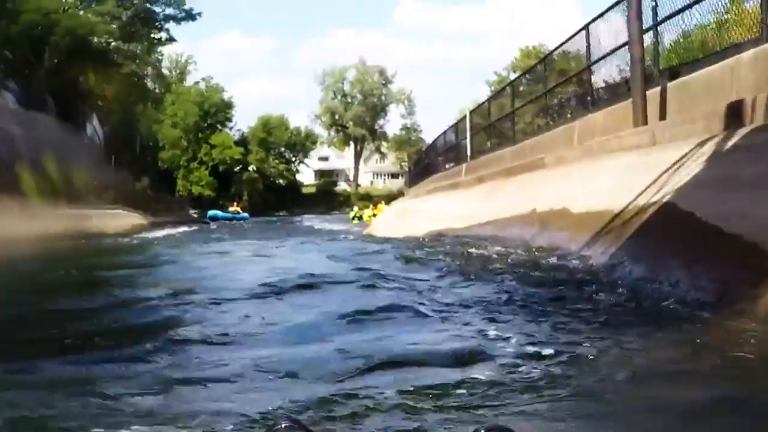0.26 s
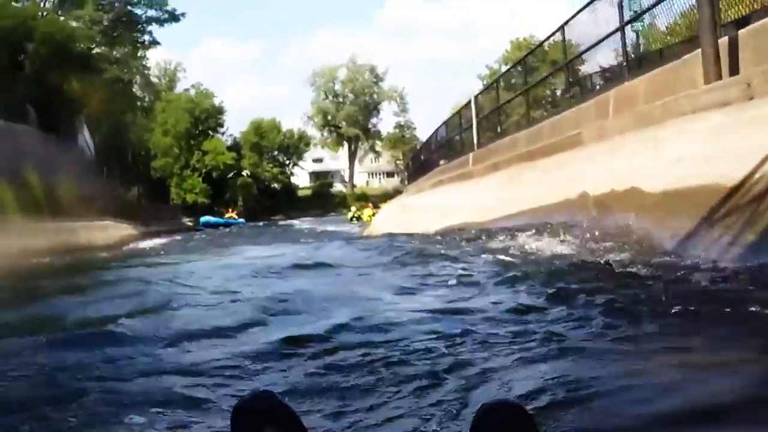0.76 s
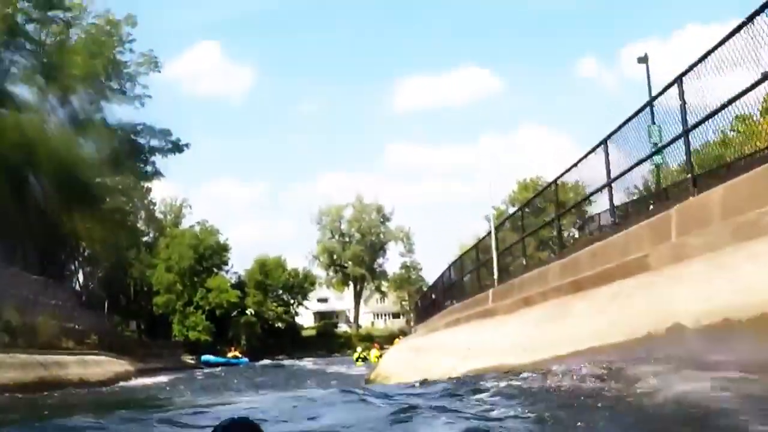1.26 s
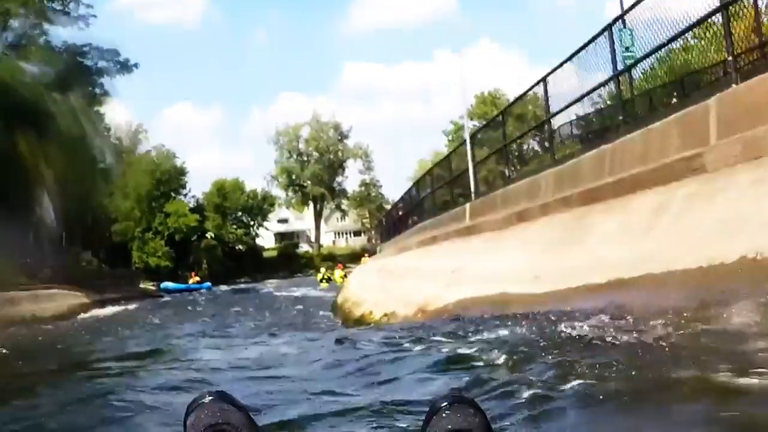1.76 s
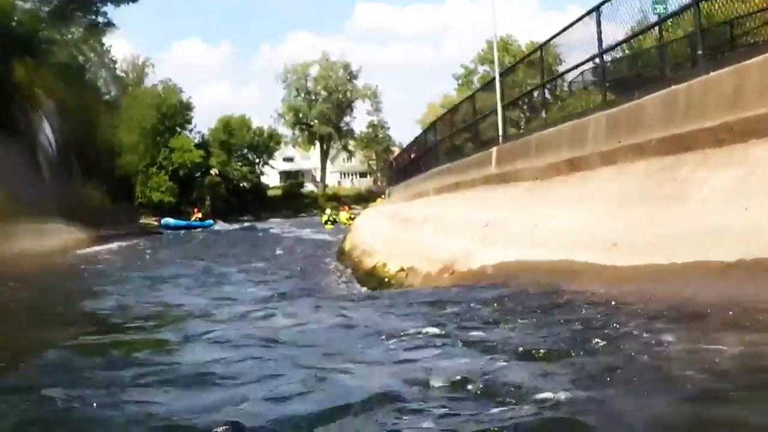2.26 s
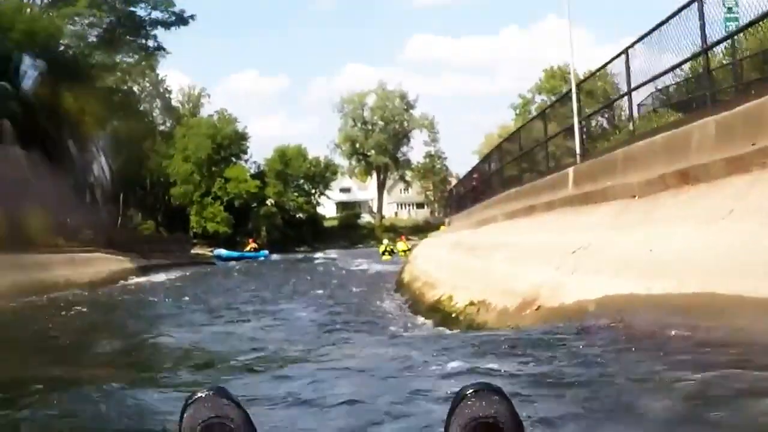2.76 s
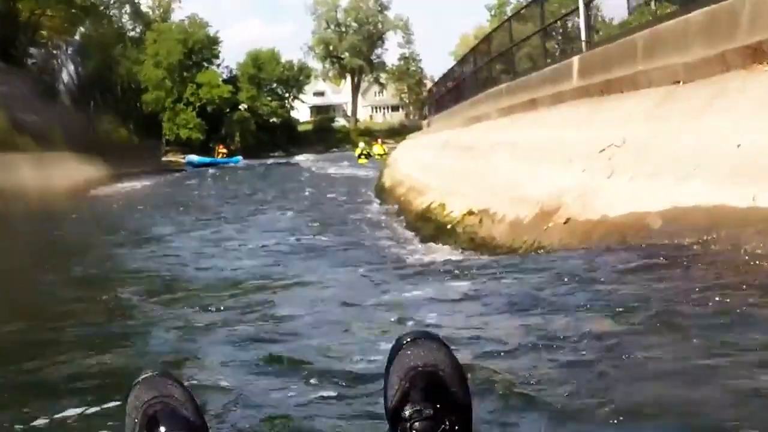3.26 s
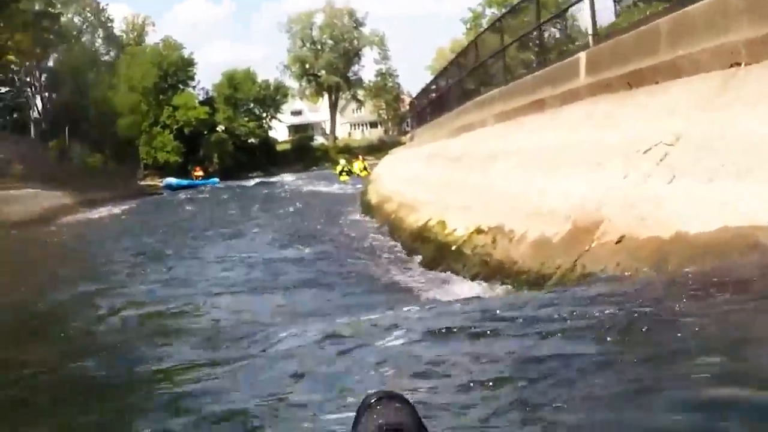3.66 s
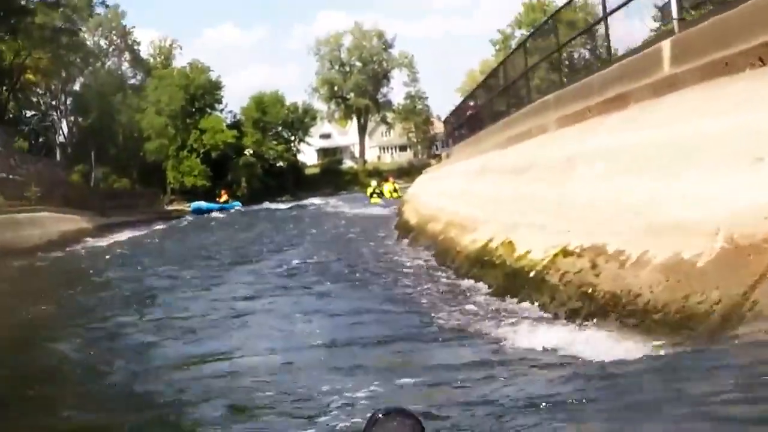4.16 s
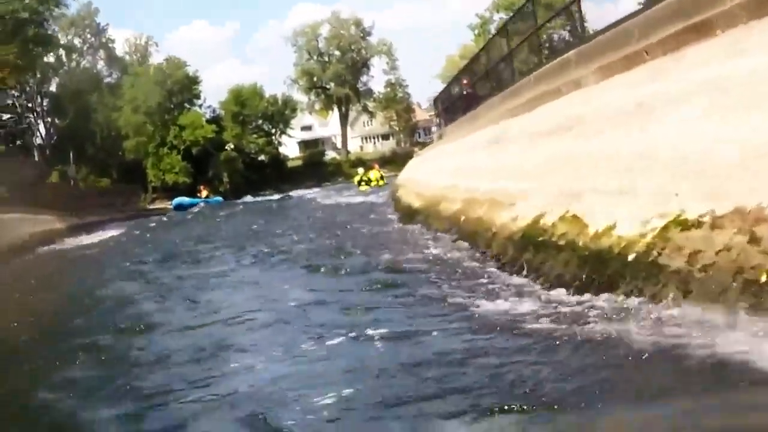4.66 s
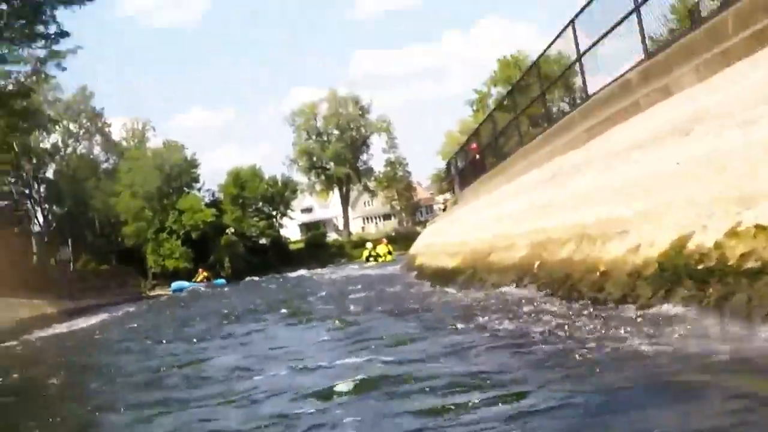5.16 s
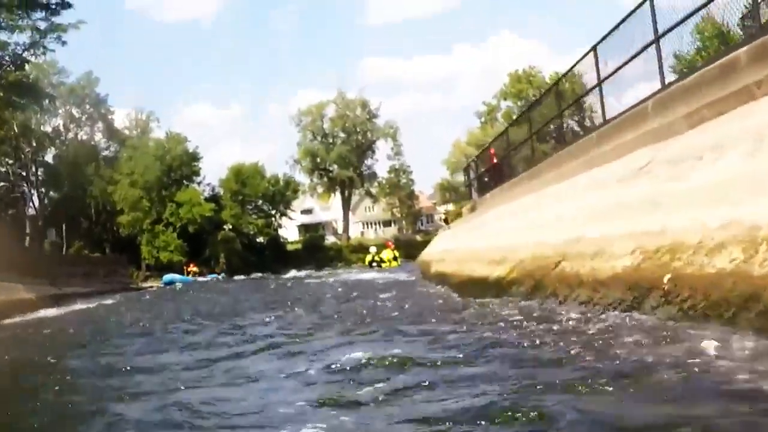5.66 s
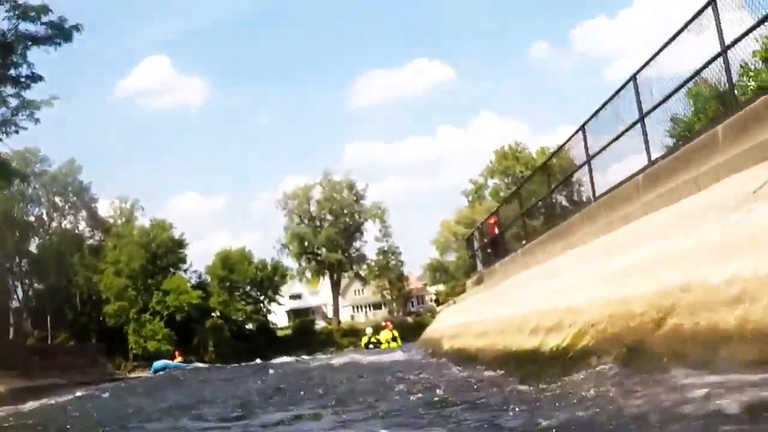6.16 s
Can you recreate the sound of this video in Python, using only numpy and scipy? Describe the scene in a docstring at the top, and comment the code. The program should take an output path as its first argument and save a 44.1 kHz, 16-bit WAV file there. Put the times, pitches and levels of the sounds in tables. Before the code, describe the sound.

Fast water streams past microphones sealed in a waterproof housing just above the surface, giving a close, hollow, mid-heavy rush with little open treble and a faint diffuse hiss around it. Bubbles blip and droplets tick throughout, over low buffeting rumble. From 0 to 1.5 s the flow is fairly even, with soft knocks near 0.8 and churning from 1.1. At 1.6 a strong dull knock slaps the float; bright plops and spatter follow at 1.75 and 2.05 to 2.15. At 2.55 another thud leads into a low gulp of air, with fainter gulps around 3. It then steadies until crisp splashes and bubbles at 4.45 to 4.6. Heavy, very deep thumps heave the float from 5.0 to 5.4 as gurgling strengthens. Splashes snap at 5.8, a knock lands at 6.05, and bubbles, drops and a last low heave crowd 6.2 to 6.4.

```python
"""Riding fast water in a channel

Place: just above fast river water in a concrete channel, two microphones inside a waterproof housing.
Near: noise, droplet clicks and splashes drive the housing's resonances; bubbles are sliding sines and
drops are bursts of narrow noise. All around: a diffuse hiss of shaped noise.
Under the float: noise rumbles and churns; deep steady-pitched pulses make thumps, gliding tones make
dull knocks and gulps of air."""
import sys
import numpy as np
from scipy import signal
from scipy.io import wavfile
from scipy.ndimage import uniform_filter1d, map_coordinates

SR = 44100
rng = np.random.default_rng(int(sys.argv[2]) if len(sys.argv) > 2 else 0)


def inscribe(sig):
    """Save sig as 16-bit PCM at rate SR to the path in sys.argv[1].

    A 1-D sig is mono; a 2-D sig holds one channel per row.
    Samples are clipped to [-1, 1] before scaling.
    """
    pcm = np.round(np.clip(np.atleast_2d(sig).T, -1, 1) * 32767)
    wavfile.write(sys.argv[1], SR, pcm.astype(np.int16))


N = 283122


def from_db(db):
    """Decibels to gain."""
    return 10 ** (np.asarray(db) / 20)


def rms_one(x):
    """Scale to rms 1."""
    return x / np.sqrt(np.mean(x ** 2) + 1e-20)


def in_time(rows):
    """Each column of a curve at every sample."""
    s, *columns = np.transpose(rows)
    return [np.interp(np.arange(N) / SR, s, column) for column in columns]


def blend(hz, corners_hz, values):
    """Values given at a few frequencies, joined on a log axis."""
    shares = [np.interp(np.log(hz), np.log(corners_hz), row) for row in np.eye(len(values))]
    return sum(share * value for share, value in zip(shares, values) if share > 0)


def drift(rate_hz):
    """Slow chance with spread 1: noise low-passed twice at the rate."""
    step = 40   # samples between slow values
    pole = np.exp(-2 * np.pi * rate_hz * step / SR)
    noise = rng.standard_normal(N // step + 2002)
    slow = signal.lfilter([1], [1, -2 * pole, pole * pole], noise)[2000:]   # drop the filter's start
    return np.interp(np.arange(N) / step, np.arange(len(slow)), rms_one(slow))


def add(out, s, sound):
    """Mix a short sound in at time s."""
    start = max(round(s * SR), 0)
    part = out[..., start:start + sound.shape[-1]]
    part += sound[..., :part.shape[-1]]


def coloured(spectrum, alike):
    """Stereo noise from half-octave bands, rms 1; alike is the likeness of left and right."""
    hz, db = np.transpose(spectrum)
    edges = np.geomspace(hz[0], hz[-1], round(2 * np.log2(hz[-1] / hz[0])) + 2)
    white = rng.standard_normal((2, 2, N))
    out = 0
    for k, band in enumerate(zip(edges, edges[1:])):
        # neighbouring bands take turns on two independent noises
        noise = signal.sosfilt(signal.butter(2, band, "band", fs=SR, output="sos"), white[k % 2])
        out = out + noise * from_db(blend(np.sqrt(np.prod(band)), hz, db))
    shared, opposed = out
    alike = np.clip(alike, -1, 1)
    return rms_one(np.sqrt(1 + alike) * shared + np.sqrt(1 - alike) * opposed * [[1], [-1]])


def evened(x, window_s):
    """Noise with its chance swells taken out."""
    return x / np.sqrt(uniform_filter1d(np.mean(x ** 2, axis=0), int(window_s * SR)) + 1e-9)


# the stream along the channel; only departures from each column's mean count:
# [t/s, wash level/dB, gurgle level/dB, spray level/dB]
STREAM_LEVELS = [(0.0, -48, -43.5, -56), (0.7, -47, -45, -58), (1.2, -47.5, -42, -59),
                 (1.58, -43.5, -41, -57.5), (1.85, -44, -43, -56.5), (2.1, -45, -39.5, -52),
                 (2.35, -44.5, -43.5, -55), (2.7, -46.5, -38.5, -50.5), (3.2, -46.5, -42, -57.5),
                 (4.05, -46, -42.5, -59), (4.25, -45.5, -41.5, -53.5), (4.65, -46.5, -39, -51.5),
                 (4.97, -46, -38, -46), (5.2, -44.5, -35.5, -49), (5.45, -46, -37.5, -55),
                 (5.8, -45, -37.5, -51.5), (6.08, -44, -37, -54.5), (6.42, -44.5, -39, -51.5)]


def stream():
    """Wash, gurgle and spray of the passing water, in dB about their means."""
    return [db - np.mean(db) for db in in_time(STREAM_LEVELS)]


def droplets(spread_db, count=1900):
    """Clicks of droplets that land at random, mostly small; rms 1."""
    when, size, sign = rng.random((count, 3)).T
    strength = from_db(-spread_db * np.log(size + 0.05)) * np.sign(sign - .5)
    return rms_one(np.bincount((when * N).astype(int), strength, N))


def wavering(ring, share=0.01522, rate_hz=5):
    """Water sloshing over the housing bends the pitch of a resonance a little."""
    shift = share * SR / (2 * np.pi * rate_hz) * drift(rate_hz)   # in samples
    return map_coordinates(ring, [np.arange(N) + shift], order=2)


def housing(drive, hz, width_hz, left_db, right_db, lead):
    """One resonance of the housing, which the two microphones hear with their own strength and phase."""
    b, a = signal.iirpeak(hz, hz / width_hz, fs=SR)
    twice = [np.r_[b, a]] * 2   # the same resonance, passed twice
    ring = wavering(signal.sosfilt(twice, drive)) / np.sqrt(np.pi * width_hz / (2 * SR))
    # a quarter-cycle copy of the ring lets the right microphone trail by any phase
    earlier, later = np.roll(ring, 1), np.roll(ring, -1)
    quadrature = (earlier - later) / (2 * np.sin(2 * np.pi * hz / SR))
    left = from_db(left_db) * ring
    right = from_db(right_db) * (np.cos(lead) * ring + np.sin(lead) * quadrature)
    return np.array([left, right])


# resonances of the housing around the two microphones:
# [f/Hz, width of each filter pass/Hz, left level/dB, right level/dB, lead of the left microphone/rad]
HOUSING_MODES = [(272, 214, -51, -55, 2.5), (397.4, 185, -50.5, -65, -1.5), (624, 210, -51, -52.5, -2.16),
                 (740, 180, -47, -50.5, -3.0), (1000, 520, -73, -53.5, 1.5), (1023, 130, -47.5, -54, 2.5),
                 (1242, 260, -49.5, -42.5, -2.5), (1331, 140, -47.5, -42.5, -3),
                 (1483.5, 90, -50, -45, 1.5), (1570, 520, -64, -49.5, -0.0), (1707, 520, -55, -49.5, -2),
                 (2023, 200, -51.5, -55, -2), (2300, 200, -66, -58, 2.5), (2657, 520, -53.5, -63.5, -1.3),
                 (3072, 240, -52.5, -52.5, -1.45), (3046, 660, -62.5, -65.5, 0.9),
                 (4040, 270, -65.5, -89, -1), (4410, 740, -64, -73, -2), (5150, 480, -64, -65.5, 3.5),
                 (5880, 830, -62, -68.5, 5), (6430, 1140, -65.5, -65.5, 4)]


def rush(wash, gurgle, spray, wash_db=0.3, gurgle_db=-2.0, ring_db=-2.5, spray_db=-1.1,
         patchy_db=1.44, low_grain=0.33, high_grain=0.46):
    """Smooth white water, pattering droplets and splashes all drive the housing's resonances."""
    impacts, washes = splashes(impact=0.59)
    swells_db = [wash + wash_db, gurgle + gurgle_db, (gurgle + spray) / 2 + ring_db, spray + spray_db]
    clumps_db = drift(19)   # drops land in clumps that stir all resonances at once
    out = np.zeros((2, N))
    for hz, *mode in HOUSING_MODES:
        flow_db = blend(hz, [600, 1400, 3000, 5000], swells_db)
        flow = from_db(flow_db + patchy_db * drift(9.8))
        # share of the power that arrives as droplets
        grain = np.clip(blend(hz, [700, 3000], [low_grain, high_grain]), 0, 1)
        patter = rms_one(from_db(2.4 * clumps_db) * droplets(spread_db=4.0))
        drops = flow * np.sqrt(grain) * patter
        # body strongest at 1500 Hz, spatter from 3300 Hz, nothing below 700 Hz
        impact, splash = [blend(hz, [700, 1500, 3300], [0, *part]) for part in (impacts, washes)]
        white_water = np.sqrt((1 - grain) * flow ** 2 + splash ** 2) * rng.standard_normal(N)
        out += housing(white_water + drops + impact, hz, *mode)
    return out


def nearest_mode(hz):
    """The housing resonance closest to a pitch."""
    return min(HOUSING_MODES, key=lambda mode: abs(mode[0] - hz))


# diffuse hiss of the whole channel: [f/Hz, relative level/dB per Hz]
HISS_COLOUR = [(220, -11.5), (500, -22), (900, -22), (1250, -14.5), (1800, -29), (2500, -31), (4200, -33),
               (6200, -33.5), (8300, -35.5), (10200, -32), (12000, -40), (14500, -55)]


def hiss(spray, level_db=-49.5, follows=0.17, vary_db=0.55):
    """Shaped noise, unalike at the two microphones, whose level varies slightly and follows the spray a little."""
    level = from_db(level_db + follows * spray + vary_db * drift(60))
    return level * coloured(HISS_COLOUR, alike=0.0)


# waves that swell the rumble: [t of the crest/s, peak level/dB, half length/s]
RUMBLE_WAVES = [(0.08, -35, 0.15), (0.288, -37, 0.16), (0.821, -31, 0.016), (1.844, -34, 0.027),
                (2.548, -28.5, 0.035), (3.093, -33, 0.041), (3.56, -34, 0.051), (3.814, -32, 0.11),
                (5.164, -26, 0.059), (5.323, -19.5, 0.028), (5.68, -28.5, 0.066), (6.368, -34, 0.041)]


def buffeting(gurgle, level_db=-34, follows=1, lumpy_db=3.0, lumps_hz=8):
    """Strength of the buffeting in dB: it grows with the flow, comes in lumps and swells under each wave."""
    t = np.arange(N) / SR
    lumps = drift(lumps_hz)
    # slower swells are taken out, so that the lumps stay short
    lumps = rms_one(lumps - uniform_filter1d(lumps, int(2 * SR / lumps_hz)))
    power = from_db(level_db + follows * gurgle + lumpy_db * lumps) ** 2
    for s, db, half_s in RUMBLE_WAVES:
        swell = from_db(db) * np.exp(-((t - s) / half_s) ** 2)
        power = power + swell ** 2
    return 10 * np.log10(power)


# low buffeting of the ride: [f/Hz, relative level/dB per Hz]
RUMBLE_SPECTRUM = [(14, 3.5), (25, 0), (40, -4.5), (70, -6.5), (105, -18), (160, -28), (300, -41.5)]


def rumble(buffet_db):
    """Low buffeting noise, nearly the same at both microphones."""
    return from_db(buffet_db) * evened(coloured(RUMBLE_SPECTRUM, alike=0.95), window_s=0.059)


# water churning under the float: [f/Hz, relative level/dB per Hz]
CHURN_SPECTRUM = [(40, -32), (80, -3), (130, 0.5), (195, -9.5), (270, -8), (380, -26), (900, -36)]
# bouts of churning, levels before the flutter: [t of the start/s, length/s, level/dB]
CHURNING_BOUTS = [(0.0, 0.44, -51), (1.072, 0.39, -40), (1.96, 0.066, -40), (2.567, 0.11, -36),
                  (2.86, 0.21, -41), (5.882, 0.19, -41.5), (6.353, .08, -40)]


def churning(gurgle, level_db=-47, follows=0.74, attack_s=0.042, release_s=0.011, flutter_db=0.9):
    """Water churns under the float: faintly with the flow, and in bouts that rise, hold and die away."""
    t = np.arange(N) / SR
    power = from_db(level_db + follows * gurgle) ** 2
    for s, length_s, db in CHURNING_BOUTS:
        rise = np.clip((t - s) / attack_s, 0, 1)
        fall = np.exp(-np.maximum(t - s - length_s, 0) / release_s)
        power = power + (from_db(db) * rise * fall) ** 2
    flutter = from_db(flutter_db * drift(42))
    return np.sqrt(power) * flutter * evened(coloured(CHURN_SPECTRUM, alike=0.63), window_s=0.056)


def tick(db, hz, decay_s=0.0011, pan_db=12, octaves_per_khz=0.077):
    """A drop bursts on the housing: a short crackle around one pitch, phased by the nearest resonance."""
    t = np.arange(SR // 50) / SR
    octaves = octaves_per_khz * hz / 1000   # higher ticks are broader
    band = hz * 2 ** (np.array([-.5, .5]) * octaves)
    crackle = rng.standard_normal(len(t)) * np.exp(-t / decay_s)
    crackle = signal.sosfilt(signal.butter(3, band, "band", fs=SR, output="sos"), crackle)
    burst = signal.hilbert(crackle)   # complex, so that its phase can be turned
    lead = nearest_mode(hz)[-1]
    pair = np.real([burst, burst * np.exp(-1j * lead)])
    return from_db([[db], [db - pan_db]]) * pair / np.abs(burst).max()


# near drops on the housing, stronger at the left microphone: [t/s, left peak level/dB, f/Hz]
NEAR_TICKS = [(0.0075, -39, 6000), (0.03, -45, 5500), (0.0515, -42, 5800), (0.1082, -33, 2950),
              (0.536, -44, 6050), (1.1395, -46, 5800), (1.518, -35, 5500), (1.920, -36, 4900),
              (1.921, -34, 2950), (2.0443, -40, 5000), (2.0675, -40, 6030), (2.069, -41, 3080),
              (2.086, -44, 4250), (2.110, -38, 2950), (2.124, -37, 3060), (2.1495, -39, 5800),
              (2.294, -30, 3000), (2.613, -45, 6200), (2.670, -45, 5400), (2.800, -36, 4400),
              (2.979, -37, 5000), (3.372, -48, 4500), (4.164, -39, 5700), (4.4562, -33, 3060),
              (4.623, -28, 3190), (4.6443, -34, 3040), (4.750, -35.5, 5930), (4.8343, -32, 5700),
              (4.9775, -35, 4320), (5.259, -38, 5900), (5.728, -37, 5970), (5.745, -36, 5860),
              (5.761, -31.5, 2980), (5.7785, -34, 5830), (5.853, -32, 5130), (5.8613, -42, 4830),
              (5.919, -30, 3060), (6.0935, -42, 4300), (6.127, -40, 4740), (6.3784, -30, 2800),
              (6.3903, -42, 6250)]


def ticks(spray, small_db=-47.0, spread_db=-0.5, follows=0.74, treble_fall_db=2.0, lowest_hz=4200, count=110):
    """The near drops, and a faint patter that follows the spray."""
    out = np.zeros((2, N))
    for s, db, hz in NEAR_TICKS:
        add(out, s, tick(db, hz))
    for when, size, height in rng.random((count, 3)):
        octaves = 0.7 * height
        db = small_db + follows * spray[int(when * N)]
        db = db - spread_db * np.log(size + 0.05) - treble_fall_db * octaves
        add(out, when * N / SR, tick(db, lowest_hz * 2 ** octaves))
    return out


BUBBLE_SAG = 0.037   # share of pitch lost per swelling time


def bubble(db, hz, cycles, pan_db, sag=BUBBLE_SAG):
    """A bubble swells, rings and slides in pitch; the nearest resonance sets its phase at the microphones."""
    rise = cycles * SR / hz   # samples to full swing
    age = np.arange(int(10 * rise)) / rise
    phase = 2 * np.pi * cycles * age * (1 - sag * (age / 2 - 1))
    lead = nearest_mode(hz)[-1]
    swing = (age * np.exp(1 - age)) ** 2
    return from_db([[db + pan_db / 2], [db - pan_db / 2]]) * swing * np.sin([phase, phase - lead])


# single bubbles near the microphones:
# [t of full swing/s, peak level/dB, f/Hz, cycles to full swing, left over right level/dB]
NEAR_BUBBLES = [(0.063, -40, 1464, 5, -5.5), (0.672, -36, 1250, 6, -4), (0.686, -30, 1050, 8, 4.5),
                (0.762, -33, 1326, 4, 5), (1.112, -34, 1360, 5, -6), (1.647, -35, 1430, 4, -7),
                (1.702, -32, 1045, 8, 3), (1.7560, -28.5, 3200, 4.4, -2), (1.7564, -31.5, 2720, 3.1, 2),
                (1.756, -27.5, 2200, 2.5, 7), (2.0572, -26.5, 1288, 3.2, -12.5),
                (2.0564, -37, 1580, 3.5, -14), (2.0568, -30, 2720, 5, 6), (2.113, -37, 636, 3, 6),
                (2.145, -31, 1360, 6, -9.5), (2.5415, -27.5, 1900, 3.9, 1), (2.552, -39, 1396, 4, -4),
                (2.78, -35.5, 1645, 7, -14), (2.83, -33, 2800, 7.5, 9), (2.852, -32, 1378, 4, 0),
                (3.250, -35, 2070, 10, 1), (3.478, -35.5, 1450, 5, -11), (3.484, -41, 507, 2.5, 0),
                (3.761, -39, 2050, 8, 0), (4.4579, -27, 1522, 2.64, -10), (4.5075, -23.5, 1506, 5.5, -11.5),
                (4.733, -36.5, 1430, 5, -7), (5.224, -32, 1040, 4, 4), (5.540, -36.5, 1520, 6, -13),
                (5.576, -35, 1330, 6, -2), (5.855, -38, 999, 3.5, 1), (6.024, -43, 1160, 5, -1),
                (6.046, -37, 395, 3, 11), (6.189, -31, 1450, 6, -13), (6.195, -32, 1570, 4, -10),
                (6.283, -28, 1370, 4, -11), (6.308, -27, 1270, 6, -2), (6.3445, -29.5, 2820, 3.5, 11),
                (6.395, -32, 1378, 4, -12)]


def bubbles(gurgle, small_db=-44.5, spread_db=1.5, follows=0.66, treble_fall_db=7, lowest_hz=1050,
            cycles=4.9, slide=0.086, count=800):
    """The near bubbles, and a crowd of faint ones that follows the gurgle, each sliding up or down."""
    out = np.zeros((2, N))
    for s, db, hz, turns, pan_db in NEAR_BUBBLES:
        add(out, s - turns / hz, bubble(db, hz, turns, pan_db))
    for when, size, height, bend in rng.random((count, 4)):
        octaves = 1.5 * height ** 1.6   # large, low bubbles are the most common
        hz = lowest_hz * 2 ** octaves
        db = small_db + follows * gurgle[int(when * N)]
        db = db - spread_db * np.log(size + 0.08) - treble_fall_db * octaves
        _, _, left_db, right_db, _ = nearest_mode(hz)
        sag = BUBBLE_SAG + slide * (2 * bend - 1)
        add(out, when * N / SR, bubble(db, hz, cycles, left_db - right_db, sag))
    return out


# splashes against the housing, dying washes over the usual rush:
# [t/s, body level/dB, spatter level/dB, decay/s]
HOUSING_SPLASHES = [(1.618, -2, -15, 0.015), (2.045, -2, 11, 0.0061), (2.068, -6, 1, 0.04),
                    (4.454, 13, 6, 0.0026), (4.489, 10, 11, 0.008), (4.623, 1, 4.5, 0.057),
                    (5.78, 9, 10, 0.012), (5.852, 14, 16, 0.0024), (6.367, 3, 8, 0.028),
                    (6.389, 12, 14, 0.0041)]


def splashes(impact, pop_body_db=26, pop_spatter_db=24):
    """Sharp impacts and dying washes, each with body and bright spatter; near bubbles spit a little too."""
    impacts, washes = np.zeros((2, 2, N))
    t = np.arange(SR // 5) / SR
    for s, body_db, spatter_db, decay_s in HOUSING_SPLASHES:
        size = from_db([[body_db], [spatter_db]])
        add(impacts, s, size * impact * np.sqrt(decay_s * SR / 2))
        add(washes, s, size * np.exp(-t / decay_s))
    for s, db, hz, cycles, _ in NEAR_BUBBLES:
        size = from_db([[db + pop_body_db], [db + pop_spatter_db]])
        add(washes, s - cycles / (2 * hz), size * np.exp(-t * hz / cycles))
    return impacts, washes


# dull knocks on the float: [t/s, thud level/dB, first f/Hz, last f/Hz, rise/s]
FLOAT_KNOCKS = [(0.793, -24, 248, 29, 0.007), (1.6156, -12, 162, 21.2, 0.013), (2.57, -16, 59, 44, 0.0052),
                (3.052, -25, 70, 55, 0.016), (4.745, -34, 62, 50, 0.013), (4.967, -23, 66, 46, 0.0073),
                (5.149, -24.5, 85, 70, 0.012), (5.778, -25.5, 92, 74, 0.015), (6.047, -18, 84, 74, 0.012)]


def knocks(slap_db=-15, slap_hz=310, slap_s=0.013):
    """A wave hits the float: a thud that sinks in pitch; the sharper ones also slap."""
    out, t = np.zeros(N), np.arange(SR // 4) / SR
    for s, db, first_hz, last_hz, rise_s in FLOAT_KNOCKS:
        age = t / rise_s
        hz = last_hz + (first_hz - last_hz) * np.exp(-age / 0.74)
        thud = age * np.exp(1 - age) * -np.sin(2 * np.pi * np.cumsum(hz) / SR)
        # a deep fall from a high first pitch sounds sharp
        sharpness = max(first_hz - last_hz, 0) / first_hz * min(first_hz / 150, 1)
        slap = sharpness * from_db(slap_db) * np.exp(-t / slap_s) * np.sin(2 * np.pi * slap_hz * t)
        add(out, s, from_db(db) * (thud + slap))
    return out


# swells that heave the float with one deep thump: [t of the middle/s, peak level/dB, f/Hz]
FLOAT_THUMPS = [(0.946, -27, 27), (1.003, -27, 17), (1.662, -26, 15), (1.853, -25, 11), (2.475, -27, 14.6),
                (2.524, -22, 39), (2.747, -24, 26), (3.341, -24, 29), (3.494, -24, 29), (3.787, -24, 69),
                (5.042, -18.5, 18), (5.1, -12, 21.4), (5.165, -8, 20.4), (5.244, -19, 12),
                (5.345, -11, 20.4), (5.494, -22.5, 51), (5.606, -29, 25), (5.7, -20, 53), (6.212, -17, 34),
                (6.338, -13.5, 18), (6.412, -21.5, 12.5)]


def thumps(half_cycles=0.61, edge_db=-11, edge_ratio=1.17):
    """A swell pushes the float and lets it drop back, with a quicker jolt at the turn."""
    out, t = np.zeros(N), np.arange(-SR // 5, SR // 5) / SR
    for s, db, hz in FLOAT_THUMPS:
        # half_cycles is the half length of each pulse, in its own cycles
        swing, jolt = [np.sin(2 * np.pi * f * t) * np.exp(-(f * t / half_cycles) ** 2)
                       for f in (hz, hz * edge_ratio)]
        push = swing + from_db(edge_db) * jolt
        add(out, s + t[0], -from_db(db) * push / push.max())
    return out


# air gulping under the float: [t of the middle/s, level/dB, first f/Hz, last f/Hz, half length/s]
AIR_GULPS = [(2.612, -36, 179.5, 151, 0.018), (2.658, -22, 136, 111.7, 0.032), (2.92, -31, 92.2, 112, 0.04),
             (3.045, -34, 128, 153, 0.064)]


def gulps(octave_db=-20):
    """A big pocket of air wobbles under the float: a short gliding tone with a weak octave."""
    out, t = np.zeros(N), np.arange(-SR // 5, SR // 5) / SR
    for s, db, first_hz, last_hz, half_s in AIR_GULPS:
        hz = np.interp(t, [-half_s, half_s], [first_hz, last_hz])
        phase = 2 * np.pi * np.cumsum(hz) / SR
        tone = np.sin(phase) + from_db(octave_db) * np.sin(2 * phase)
        add(out, s + t[0], from_db(db) * np.exp(-(t / half_s) ** 2) * tone)
    return out


def scene():
    """Water heard through the housing, over the rumble of the ride."""
    wash, gurgle, spray = stream()
    ride = rumble(buffeting(gurgle)) + churning(gurgle) + knocks() + thumps() + gulps()
    ride = ride * from_db([[.3], [-.3]])   # slightly stronger at the left microphone
    return rush(wash, gurgle, spray) + hiss(spray) + ticks(spray) + bubbles(gurgle) + ride


# narrow bands that the housing weakens, or lifts where the level is positive: [f/Hz, width/Hz, level/dB]
HOUSING_BANDS = [(2830, 146, -3.5), (3600, 400, 0.5), (4680, 280, -2.5), (8230, 340, -2.5),
                 (11300, 550, -2.5)]


def record(dry):
    """The housing reshapes a few narrow bands; the highest treble rolls off, then is cut steeply."""
    for hz, width_hz, db in HOUSING_BANDS:
        band = signal.lfilter(*signal.iirpeak(hz, hz / width_hz, fs=SR), dry)
        dry = dry + (from_db(db) - 1) * band
    dull = signal.sosfilt(signal.butter(4, 13300, fs=SR, output="sos"), dry)
    return signal.sosfilt(signal.ellip(10, .2, 80, 15000, fs=SR, output="sos"), dull)


dry = scene()
out = record(dry)
inscribe(out)
```